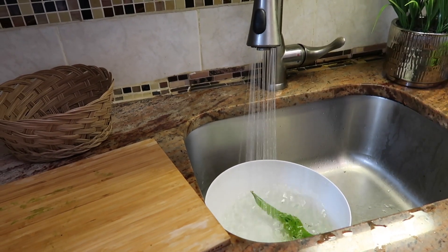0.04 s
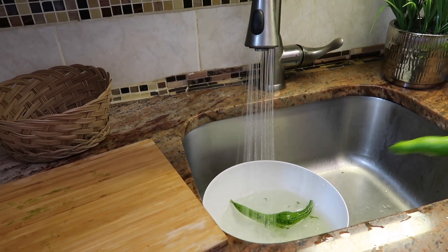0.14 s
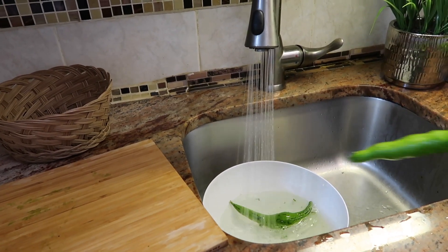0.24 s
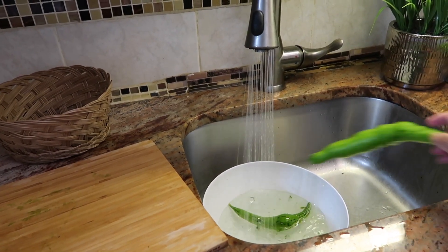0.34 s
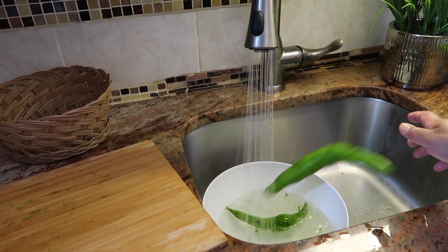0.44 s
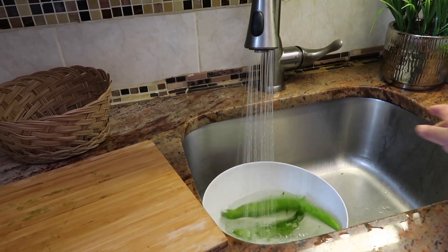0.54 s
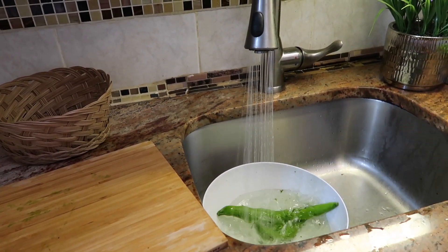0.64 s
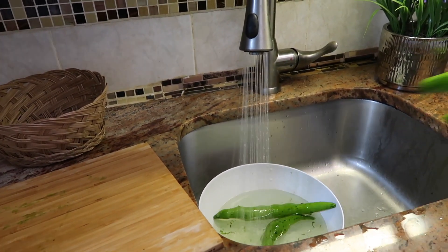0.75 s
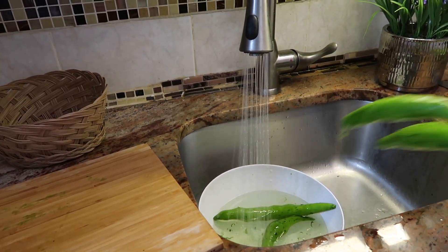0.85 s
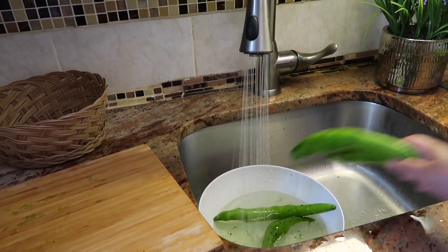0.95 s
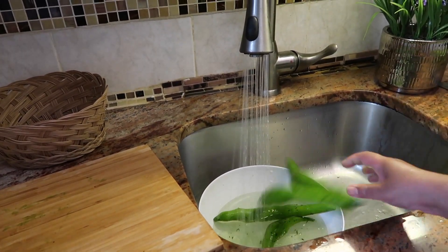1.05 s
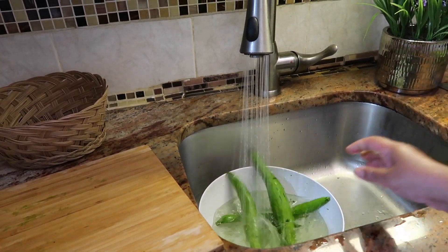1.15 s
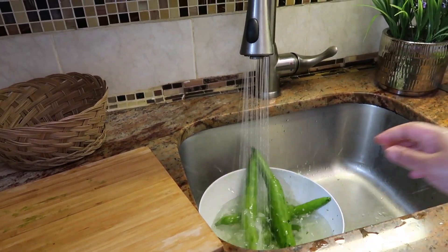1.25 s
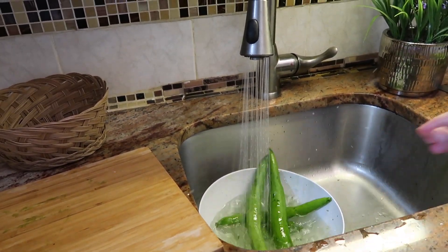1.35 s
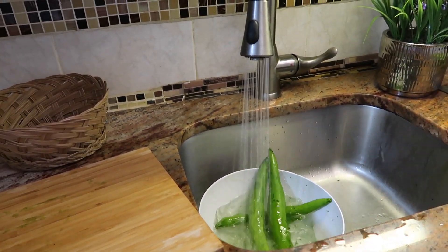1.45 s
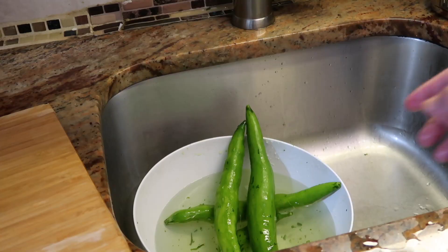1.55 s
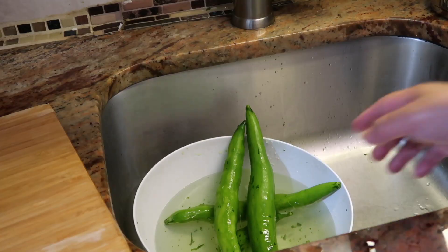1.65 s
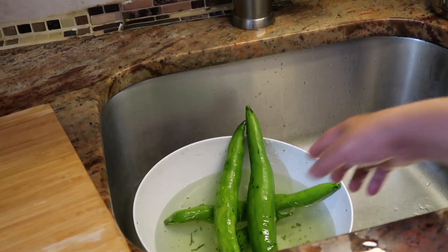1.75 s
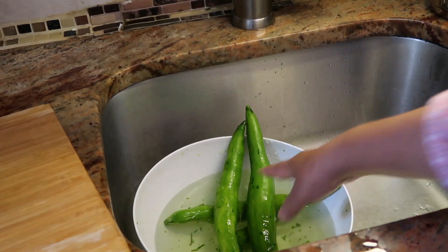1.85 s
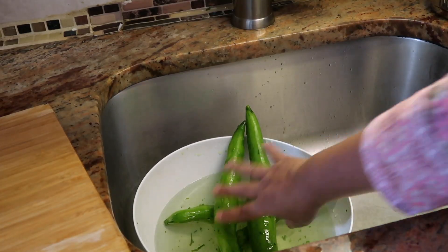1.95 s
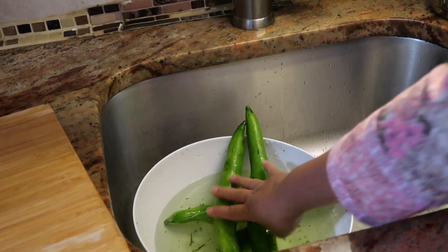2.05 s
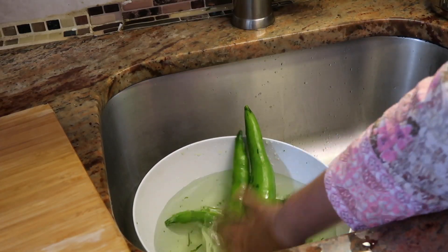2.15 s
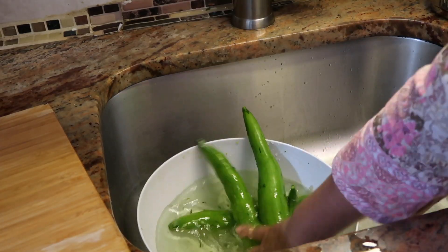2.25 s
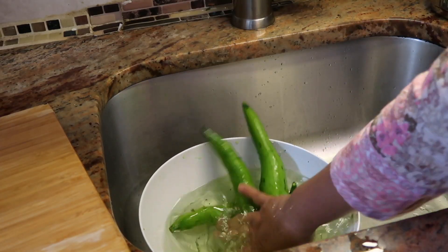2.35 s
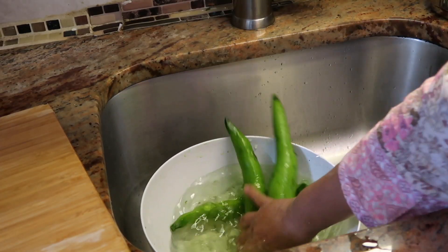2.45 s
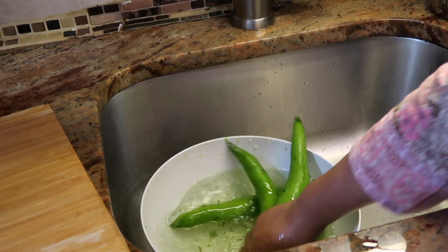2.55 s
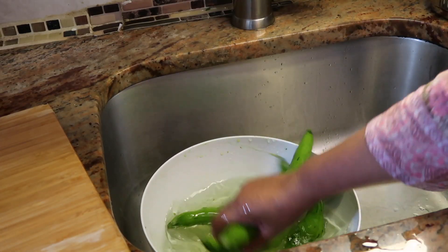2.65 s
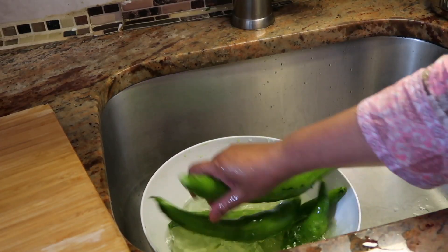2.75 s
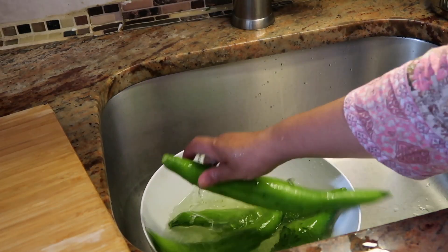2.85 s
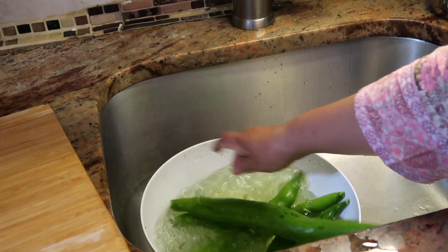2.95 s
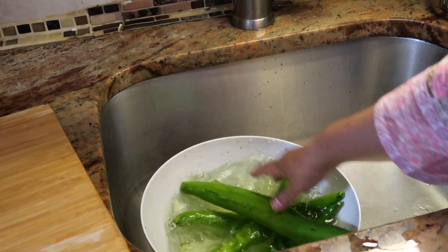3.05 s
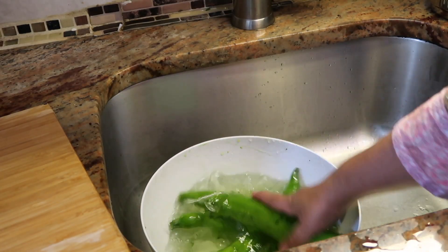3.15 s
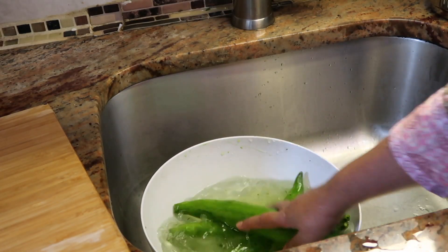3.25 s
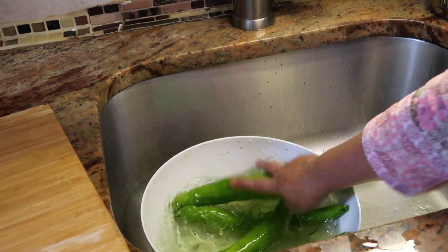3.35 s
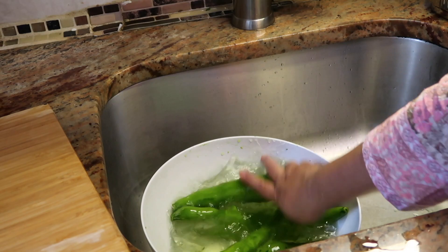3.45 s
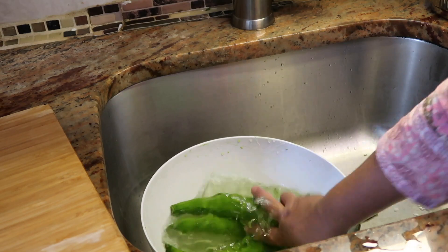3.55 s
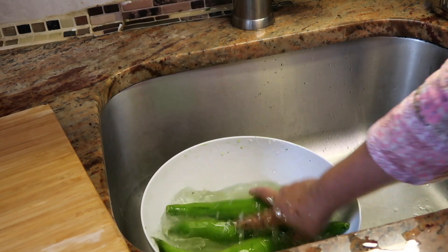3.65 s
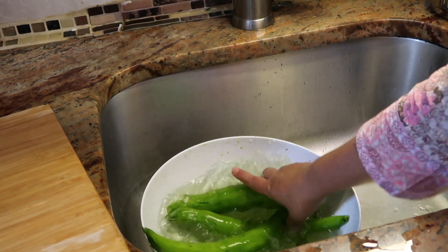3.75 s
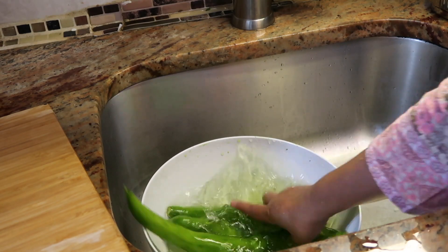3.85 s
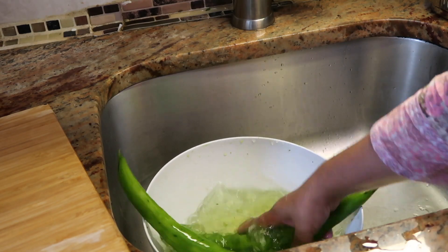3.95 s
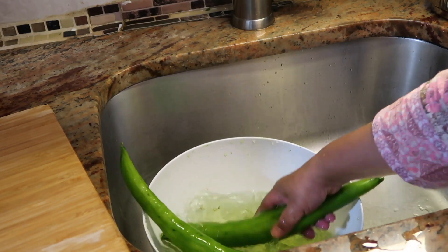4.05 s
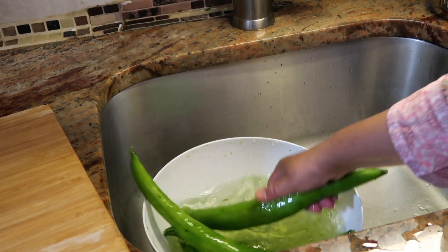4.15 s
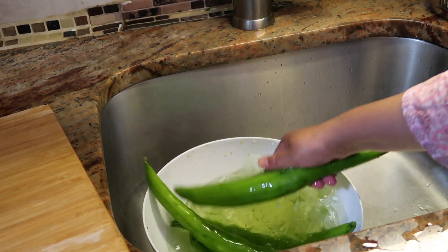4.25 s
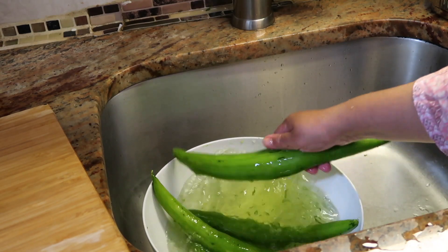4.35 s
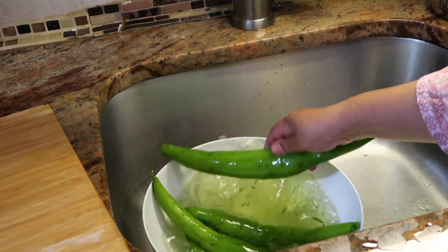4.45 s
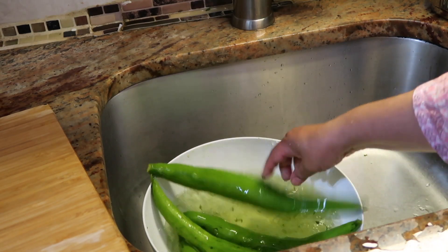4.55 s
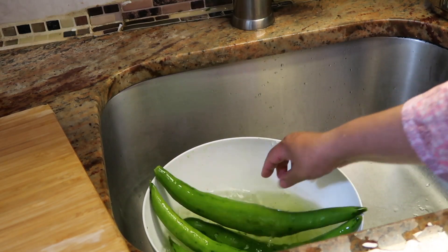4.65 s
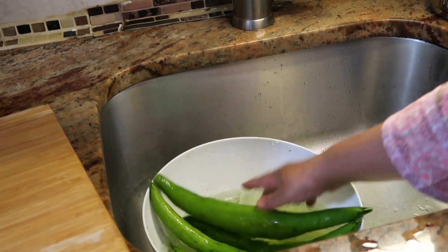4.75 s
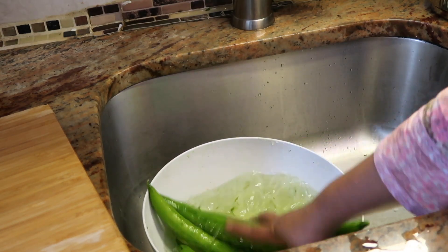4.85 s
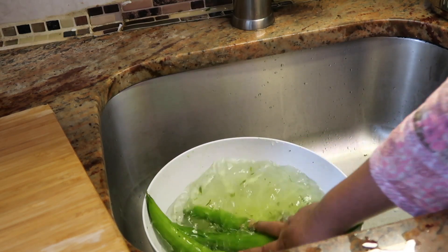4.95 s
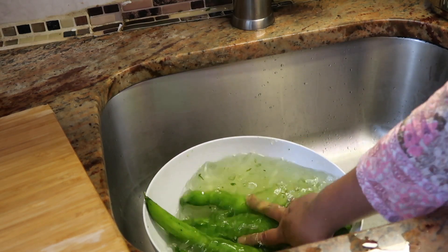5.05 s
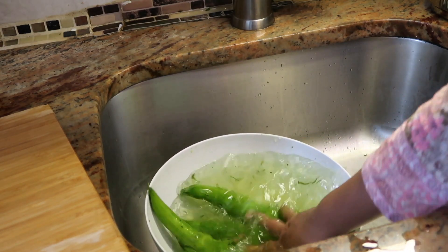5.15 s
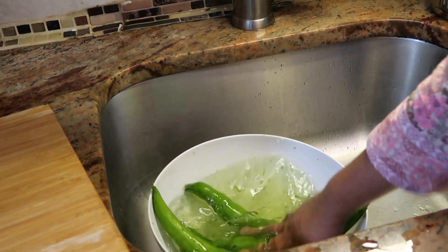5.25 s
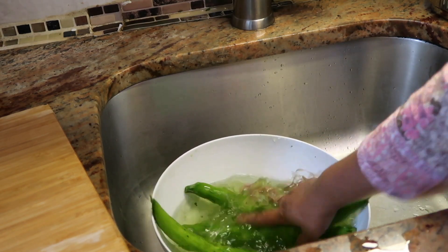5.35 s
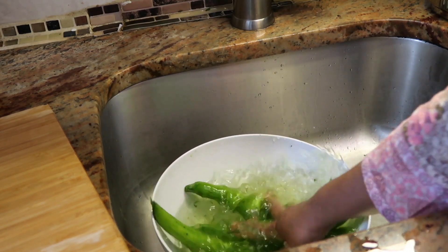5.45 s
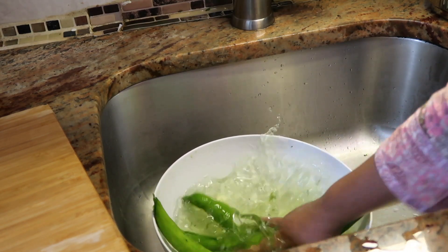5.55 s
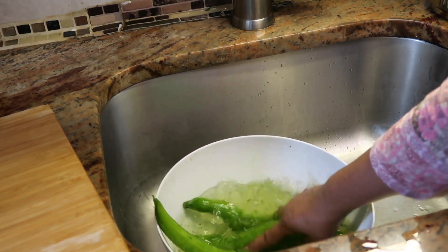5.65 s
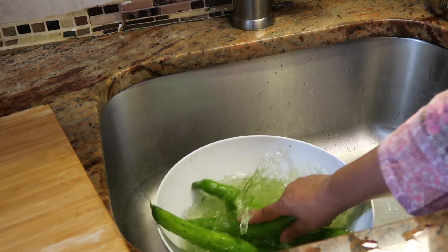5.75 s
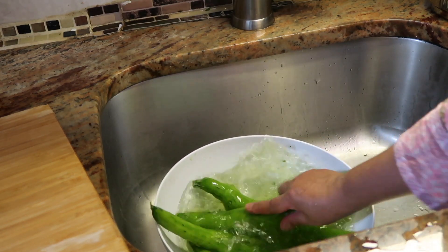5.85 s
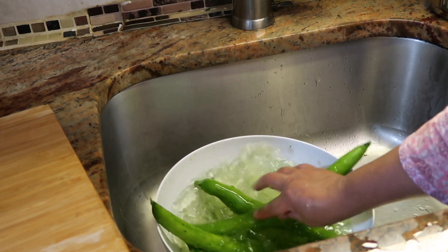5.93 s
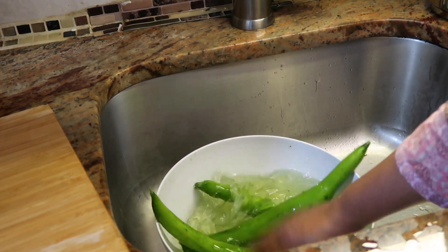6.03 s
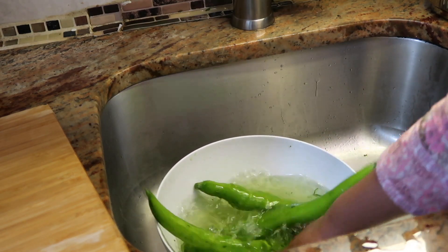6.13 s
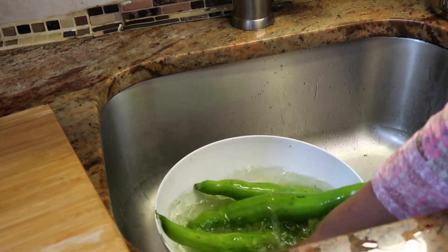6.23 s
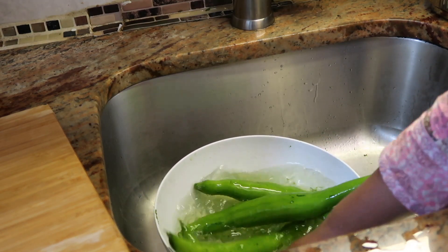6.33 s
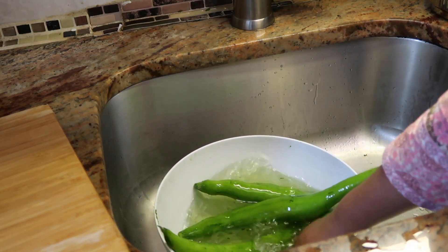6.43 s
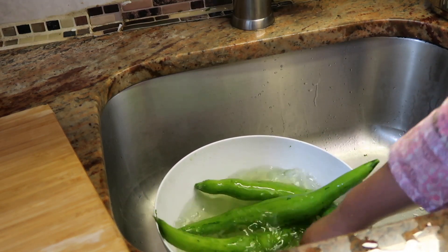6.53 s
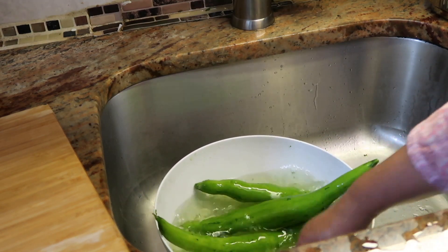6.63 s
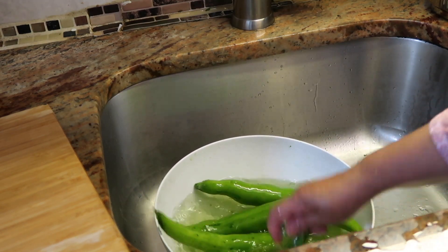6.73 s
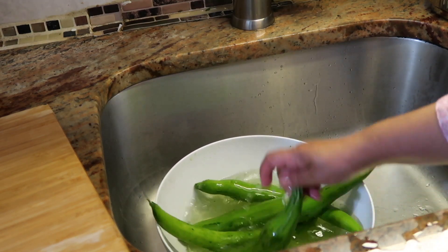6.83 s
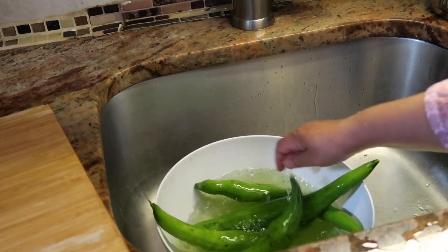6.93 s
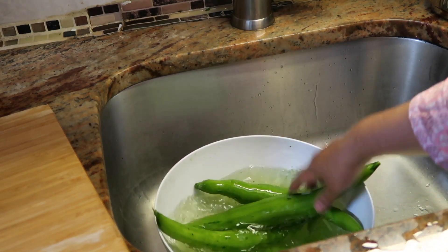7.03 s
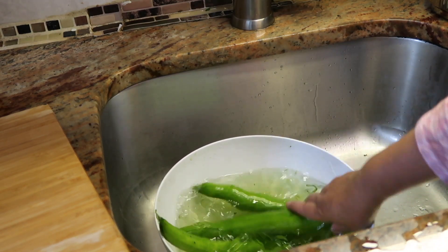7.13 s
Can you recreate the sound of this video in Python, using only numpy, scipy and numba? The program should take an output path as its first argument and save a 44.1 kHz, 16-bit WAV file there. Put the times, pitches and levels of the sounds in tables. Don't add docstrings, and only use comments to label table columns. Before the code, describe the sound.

Hissing tap spray and two bumpy drops in a steel sink cut to quiet, then close, irregular sloshing, bubbly plops and droplet ticks.

```python
import sys
import numpy as np
from scipy import signal
from scipy.fft import rfft, irfft
from scipy.io import wavfile
from scipy.ndimage import uniform_filter1d
from numba import njit

SR = 44100
rng = np.random.default_rng(int(sys.argv[2]) if len(sys.argv) > 2 else 0)


def file_out(sig):
    cols = np.atleast_2d(sig).T
    lim = np.clip(cols, -1, 1)
    pcm = np.round(lim * 32767).astype(np.int16)
    wavfile.write(sys.argv[1], SR, pcm)


def nominal_scale(level):
    x = np.asarray(level, float) / 20
    return 10 ** x


N = 317079
TIME = np.arange(N) / SR


def level(x, db):
    return x * nominal_scale(db) / np.sqrt(np.mean(x ** 2))


def curves(table):
    s, *columns = np.transpose(table)
    return [np.interp(TIME, s, column, left=-150, right=-150) for column in columns]


def colour(x, spectrum):
    hz, db = np.transpose(spectrum)
    bins = np.fft.rfftfreq(x.shape[-1], 1 / SR) + 1
    gain = nominal_scale(np.interp(np.log(bins), np.log(hz + 1), db))
    return irfft(rfft(x) * gain, x.shape[-1])


@njit
def chirps(start, hz, cycles, octaves, size):
    out = np.zeros(N)
    for e in range(len(start)):
        life = cycles[e] * SR / hz[e]
        phase = 0.
        for i in range(min(int(3 * life), N - start[e])):
            pitch_hz = min(hz[e] * 2 ** (octaves[e] * i / life), .45 * SR)
            phase += 2 * np.pi * pitch_hz / SR
            swell = (1 - np.exp(-7 * i / life)) ** 2
            out[start[e] + i] += size[e] * np.sin(phase) * swell * np.exp(-2.5 * i / life)
    return out


def bubbles(s, db, hz, cycles, rise):
    return chirps((s * SR).astype(np.int64), hz, np.clip(cycles, 1, 40), rise, nominal_scale(db))


def swarm(count, low_hz, high_hz, cycles, scatter_db):
    when, size, loudness, life = rng.random((count, 4)).T
    hz = low_hz * (high_hz / low_hz) ** size
    db = -scatter_db * np.log(1 - loudness)
    return level(bubbles(when * N / SR, db, hz, cycles * (0.35 + 1.28 * life), 0.26 * life), 0)


def ring(push, modes):
    out = 0
    for k, (hz, db, t60) in enumerate(modes):
        pole = np.exp(2j * np.pi * hz / SR - np.log(1000) / (t60 * SR))
        out = out + (-1) ** k * nominal_scale(db) * signal.lfilter([1], [1, -pole], push).imag
    return out


def sink(force):
    floor_modes = [(87, -19.5, 0.87), (129, -10, .25), (147.1, 6, 0.27), (158.3, -6, 0.75)]
    second_modes = [(189, 0.5, 0.3), (211, 4.5, 0.31), (222, -3, 0.095)]
    rim_modes = [(273, -14, .25), (299.4, -8, 0.41), (401.5, -8.5, 0.23), (483, 0, 0.088),
                 (527, -12.5, 0.099), (618, -27.5, 0.14), (704, -6.5, 0.13), (960, -21, 0.32),
                 (1230, 0.5, 0.099)]
    return ring(force[0], floor_modes) + ring(force[1], second_modes) + ring(force[2], rim_modes)


def basin(wet_db):
    # pitch_hz [Hz], t60_s [s]
    echo_times = [(300, 0.089), (1000, 0.14), (2500, 0.19), (6000, 0.17), (14000, 0.047)]
    t = np.arange(SR // 2) / SR
    hz, t60 = np.transpose(echo_times)
    tail = np.zeros((2, len(t)))
    for centre in 100 * 2 ** np.arange(0, 7.4, .5):
        edges = [centre / 2 ** .25, centre * 2 ** .25]
        sos = signal.butter(2, edges, "band", fs=SR, output="sos")
        decay = np.interp(np.log(centre), np.log(hz), t60)
        tail += signal.sosfilt(sos, rng.standard_normal(tail.shape)) * nominal_scale(-60 * t / decay)
    tail *= nominal_scale(wet_db) / np.sqrt(np.sum(tail ** 2, axis=1, keepdims=True))
    tail[0, 0] += 1
    return tail


def echoed(source, wet_db):
    return signal.oaconvolve(source[None], basin(wet_db), axes=1)[:, :N]


def kitchen():
    # pitch_hz [Hz], level_db [dB per Hz]
    room_colour = [(18, -83.5), (30, -32.5), (281, -4.5), (311, -9), (393, -6.5), (592, -15.5),
                   (656, -14.5), (917, -16), (1220, -22), (2090, -24), (14000, -69.5)]
    return level(colour(rng.standard_normal((2, N)), room_colour), -60)


def tap():
    # start_s [s], level_db [dB], treble_db [dB above level]
    flow = [(0.0, -44.5, -8.5), (0.106, -48, -0.5), (0.174, -26.5, -3), (0.578, -27, -5.5),
            (0.642, -25, -2.5), (0.75, -27.5, -2.5), (0.758, -27, -4), (0.8, -29, -3.5), (1.18, -28, -3),
            (1.196, -24, -1), (1.252, -31.5, -4.5), (1.512, -29.5, -4), (1.53, -74, -32.5)]
    # pitch_hz [Hz], level_db [dB per Hz]
    spray_colour = [(24, -52), (40, -23), (297, -6), (363, -0.5), (392, -1), (600, -7), (733, -4.5),
                    (1150, -6), (1370, -5.5), (1550, -4.5), (2100, -5), (11600, -13.5), (14100, -28.5),
                    (16000, -72)]
    db, treble_db = curves(flow)
    crackle = swarm(count=30000, low_hz=1500, high_hz=15000, cycles=1.5, scatter_db=0.0)
    foam = swarm(count=9000, low_hz=400, high_hz=4000, cycles=7.7, scatter_db=2.5)
    patter = crackle + foam
    bins = rfft(rng.standard_normal((2, N)) + .5 * np.array([patter, np.roll(patter, SR)]))
    flat = irfft(bins / uniform_filter1d(np.abs(bins), size=3000), N)
    spray = colour(flat, spray_colour)
    low = signal.sosfilt(signal.butter(2, 3500, fs=SR, output="sos"), spray)
    treble = level(spray - low, -1.5) * nominal_scale(treble_db)
    drum = level(sink(rng.standard_normal((3, N)) * nominal_scale([[-6], [-6], [0.5]])), -17)
    return nominal_scale(db) * (level(low, -0.55) + drum + treble)


def knocks():
    # start_s [s], peak_db [dB], second_db and rim_db [dB above peak]
    blows = [(0.578, -37.5, -5, -11), (0.617, -23.5, -9, 1), (0.647, -22.5, 1, -5), (0.68, -28, -6, 3),
             (1.129, -37.5, 6, 12), (1.195, -14, -7.5, -1), (2.23, -31.5, -9, -16.5),
             (2.292, -38, -7.5, -12), (2.589, -46, -3, -6), (2.928, -26, -9.5, -4), (3.054, -28, -6, -2.5),
             (3.167, -45.5, -6, -1), (3.648, -39.5, -9, -11), (3.774, -54, 9.5, -3), (4.056, -38, -10.5, 9),
             (4.668, -55, 3, 16), (4.965, -36, -6.5, -13), (5.129, -59.5, -5, 21.5),
             (5.206, -36.5, -10, -2), (5.58, -40.5, -3.5, -12), (5.988, -40.5, -7.5, -10.5),
             (6.138, -46.5, -5, -7), (6.254, -45.5, 3, 10), (6.372, -35.5, 1, 2), (6.617, -54, -5, -13),
             (7.046, -34, -10, -18)]
    s, db, second_db, rim_db = np.transpose(blows)
    force = np.zeros((3, N))
    force[:, (s * SR).astype(int)] = nominal_scale([db + 0.5, db + second_db, db + rim_db - 1])
    pushes = [np.hanning(int(ms * SR / 1000)) for ms in (3.5, 2.5, 1.1)]
    return sink([signal.lfilter(push / push.sum(), [1], f) for push, f in zip(pushes, force)])


def splashes(place, places):
    # start_s [s], level_db [dB], low_hz [Hz], high_hz [Hz], length_s [s]
    bursts = [(.62, -32.5, 400, 2980, .04), (1.188, -29.5, 500, 6850, .012), (1.943, -63, 1950, 5870, 0.22),
              (2.074, -58, 1800, 4500, 0.024), (2.253, -35.5, 693, 5950, .1),
              (2.329, -34.5, 606, 4500, 0.12), (2.67, -46, 2100, 6300, 0.038),
              (2.835, -35, 1400, 4000, 0.11), (3.028, -41.5, 500, 4000, .04),
              (3.156, -40.5, 2650, 6910, .006), (3.427, -36.5, 940, 5040, .02),
              (3.602, -36.5, 2300, 8300, 0.044), (4.05, -41, 565, 4000, .06),
              (4.653, -39.5, 400, 3550, .012), (4.952, -40.5, 2470, 8150, 0.037),
              (5.179, -43, 2270, 6050, .06), (5.348, -35.5, 1040, 6000, .08),
              (6.157, -29.5, 910, 6300, .07), (6.243, -36.5, 814, 6000, .09),
              (6.668, -31.5, 620, 3040, 0.018), (6.721, -43, 903, 3060, 0.053)]
    s, db, low_hz, high_hz, length = np.array(bursts).T[:, :, None][:, place * 0:]
    draw = rng.random((len(bursts), 24, 4)).transpose(2, 0, 1)
    start = s + length * np.sqrt(draw[0] * draw[1])
    loudness = db - 3 * np.log(1 - draw[3])
    hz = low_hz * (high_hz / low_hz) ** draw[2]
    cycles, rise = 1.6 + 5 * draw[3], 0.24 * draw[1]
    return bubbles(*(column.ravel() for column in (start, loudness, hz, cycles, rise)))


def hand(place, places):
    # start_s [s], peak_db [dB], pitch_hz [Hz], cycles
    pockets = [(2.251, -31.5, 4040, 4.6, 0.24), (2.286, -32, 670, 10, 0.35), (2.336, -20, 690, 6.6, 0.51),
               (2.544, -44, 1140, 5.9, 0.27), (2.581, -28, 2770, 7.6, 0.11), (2.658, -34, 3070, 4.6, 0.27),
               (2.781, -57, 1770, 9, 0.17), (2.796, -22, 1500, 7.5, 0.2), (2.847, -24, 1660, 6.6, 0.38),
               (2.921, -36, 533, 9, 0.19), (3.022, -38, 810, 3.4, 0.37), (3.044, -30, 870, 5.7, 0.28),
               (3.162, -29, 3120, 12, 0.51), (3.413, -59, 706, 5.7, 0.34), (3.429, -32, 1200, 5.7, 0.57),
               (3.579, -33, 3220, 9, 0.3), (3.59, -36, 950, 9.4, 0.3), (3.607, -25, 3920, 3.3, 0.21),
               (3.696, -34, 1130, 6.2, 0.3), (3.708, -20, 3440, 9, 0.12), (3.795, -27, 1600, 9, 0.25),
               (3.824, -18, 890, 3.7, 0.21), (3.912, -37, 3070, 7, 0.26), (3.938, -29, 2360, 7.6, 0.21),
               (3.968, -37, 2410, 7.9, 0.3), (3.981, -25, 2580, 7.1, 0.18), (4.036, -26, 1500, 5.6, 0.26),
               (4.052, -23, 501, 4.1, 0.17), (4.077, -18, 2270, 5.4, 0.24), (4.113, -23, 2750, 10, 0.43),
               (4.141, -26.5, 1560, 11, 0.26), (4.654, -22, 1320, 3.4, 0.22), (4.913, -40, 2740, 14, 0.3),
               (4.959, -37.5, 2760, 10.6, 0.28), (4.971, -37, 3230, 12, 0.33), (5.015, -41, 2500, 7.7, 0.3),
               (5.028, -29, 2730, 9, 0.3), (5.072, -30, 1870, 4.2, 0.18), (5.145, -40, 3430, 9.8, 0.36),
               (5.185, -33, 2870, 4.5, 0.6), (5.254, -32, 3760, 6.2, 0.26), (5.309, -19.5, 1065, 6.7, 0.32),
               (5.366, -18, 1290, 6.2, 0.15), (5.437, -32, 1300, 9.8, 0.22), (5.515, -47, 1980, 12, 0.21),
               (5.527, -26, 2120, 6.1, 0.35), (5.591, -31, 3420, 10, 0.3), (5.62, -32, 2270, 6.5, 0.19),
               (5.684, -18.5, 2370, 7.1, 0.27), (5.778, -18, 944, 8.2, 0.51), (5.84, -31, 1015, 9.9, 0.3),
               (5.887, -24, 3400, 9, 0.23), (5.917, -32, 3500, 9, 0.46), (5.961, -30, 1890, 7.8, 0.33),
               (6.119, -36, 2330, 16, 0.19), (6.161, -18, 2670, 4.6, 0.44), (6.183, -20, 1160, 4, 0.48),
               (6.36, -45, 540, 12, 0.15), (6.435, -27, 2150, 5.9, 0.38), (6.573, -35, 2850, 6.1, 0.25),
               (6.587, -34, 2780, 15, 0.13), (6.672, -32, 2166, 3, 0.24),
               (2.888, -32, 3230, 6, 0.34), (2.958, -30, 2700, 8, 0.16), (3.715, -27, 1880, 9, .1),
                    (4.299, -52.5, 3030, 9.9, .1), (4.632, -61, 7100, 14, 0.093),
                    (5.765, -36, 3770, 11, .1), (5.798, -31, 970, 4.5, .2), (6.739, -27, 3270, 9.1, 0.31),
                    (7.074, -46, 3600, 4, .3)]
    # start_s [s], peak_db [dB], pitch_hz [Hz], cycles [count]
    droplets = [(2.2525, -22.5, 4220, 1.53), (2.4426, -35, 4450, 5.6), (2.6516, -57, 6300, 7.1),
                (2.697, -41.5, 7400, 12), (2.8255, -43, 4200, 3.6), (2.844, -35, 4600, 6.3),
                (2.8886, -31, 5200, 4), (3.0323, -29, 8100, 2.8), (3.161, -44, 4730, 3.7),
                (3.4249, -44, 4800, 4), (3.4301, -29.5, 4140, 1.33), (3.4634, -28.5, 7100, 1.3),
                (3.578, -48, 5200, 4.6), (3.59, -37, 4550, 3.6), (3.6065, -23, 7260, 2.4),
                (3.755, -39.5, 4970, 4), (3.826, -37, 4200, 4.4), (3.9422, -28, 5040, 1.4),
                (4.027, -32, 10600, 4), (4.0534, -34.5, 4840, 3.3), (4.2445, -52, 4460, 5),
                (4.2954, -38, 6460, 4.8), (4.3855, -47.5, 9200, 4.8), (4.4136, -40, 4400, 2.1),
                (4.7339, -37, 11900, 12), (4.921, -42, 6100, 2.6), (4.9334, -35, 4600, 1.5),
                (4.9556, -31.5, 5770, 2.6), (5.0653, -38, 4630, 2.1), (5.2522, -52, 4360, 3.5),
                (5.3525, -31, 5630, 3.2), (5.5096, -45, 4520, 3), (5.5327, -31, 6600, 3.7),
                (5.603, -30, 6900, 2.1), (5.6753, -35, 5000, 3.2), (5.6934, -26, 4650, 1.8),
                (5.851, -42, 9500, 4), (5.885, -26, 4860, 1.6), (6.0334, -29, 7230, 1.5),
                (6.145, -37, 5040, 2.6), (6.157, -24, 5500, 1.3), (6.1786, -19, 4200, 1.33),
                (6.2615, -33, 4180, 6.4), (6.2805, -22, 5620, 2.6), (6.5757, -37, 4270, 2.5),
                (6.5843, -35, 4860, 1.7), (6.613, -39, 4600, 4.7), (6.677, -44, 5200, 4),
                (6.861, -40.5, 5630, 4.6), (7.0752, -47, 8950, 3.2)]
    # start_s [s], gurgle_db [dB], splash_db [dB], fizz_db [dB]
    stirring = [(1.9, -74, -83, -91), (2.0, -57, -62.5, -68.5), (2.12, -74, -81, -99),
                (2.28, -39, -33, -44), (2.4, -45, -24.5, -47), (2.46, -49, -37, -49.5),
                (2.56, -49.5, -55, -61), (2.65, -57.5, -87, -57), (2.84, -65, -40.5, -63),
                (2.96, -52, -45.5, -66), (3.05, -43, -60.5, -52), (3.11, -62, -79, -68.5),
                (3.19, -65, -89, -52), (3.25, -57, -97, -83), (3.48, -62, -56, -91), (3.53, -66, -79, -88),
                (3.61, -51, -31.5, -42), (3.65, -44, -51.5, -50.5), (3.73, -42.5, -39, -59),
                (3.83, -47, -43.5, -53), (3.95, -58, -52, -68), (4.05, -48, -36.5, -47),
                (4.2, -45.5, -71.5, -77.5), (4.3, -78.5, -81, -83), (4.45, -62, -101, -107),
                (4.71, -66, -65, -77), (4.86, -63.5, -91, -93), (4.98, -61.5, -56, -47),
                (5.1, -56, -42.5, -75), (5.15, -47.5, -54, -50), (5.27, -57, -47.5, -55),
                (5.44, -55, -52, -59.5), (5.54, -63, -40, -51), (5.73, -48, -42, -49),
                (5.82, -46, -38, -66.5), (5.97, -62, -55.5, -60), (6.2, -60, -64, -56),
                (6.28, -41, -39.5, -43), (6.34, -41, -49, -58), (6.41, -52.5, -41, -74),
                (6.63, -52.5, -69.5, -75), (6.7, -48, -47, -65.5), (6.78, -67, -48.5, -87.5),
                (6.83, -64.5, -76, -73.5), (6.89, -71, -94, -87.5), (7.06, -65, -60.5, -92),
                (7.19, -54, -72, -69.5)]
    s, db, hz, cycles, rise = np.transpose(sorted(pockets)[place::places])
    pops = bubbles(s, db + 7.5, hz, cycles, rise)
    s, db, hz, cycles = np.transpose(droplets[place::places])
    ticks = bubbles(s, db + 14, hz, cycles, np.full_like(hz, 0.079))
    gurgle_db, splash_db, fizz_db = curves(stirring)
    gurgle = nominal_scale(gurgle_db - 14.5) * swarm(count=500, low_hz=500, high_hz=1625, cycles=7, scatter_db=2.5)
    splash = nominal_scale(splash_db - 15) * swarm(count=1200, low_hz=1565, high_hz=4500, cycles=6.3, scatter_db=4.0)
    fizz = nominal_scale(fizz_db - 8.5) * swarm(count=3000, low_hz=4500, high_hz=14000, cycles=7.3, scatter_db=3.5)
    return pops + ticks + gurgle + splash + fizz + splashes(place, places)


def scene():
    # pitch_hz [Hz], side_db [dB above mid]
    ports = [(60, -22.5), (110, -47.5), (200, -20), (380, -17.5), (700, -19), (1290, -20), (2380, -14.5),
             (4400, -6), (8120, -1), (15000, 4)]
    # start_s [s], fade_in_s [s], end_s [s], fade_out_s [s]
    shots = [
        (-.1, .01, .756, .012),
        (0.754, .05, 1.524, .014),
        (1.522, 0.058, 7.4, .01),
    ]
    water = kitchen() + tap() + echoed(knocks(), wet_db=-2.0)
    for place in range(5):
        water += echoed(hand(place, places=5), wet_db=3.5)
    edit = np.zeros(N)
    for start, fade_in, end, fade_out in shots:
        edit += np.clip((TIME - start) / fade_in, 0, 1) * np.clip((end - TIME) / fade_out, 0, 1)
    mid, side = water[0] * edit, colour(water[1] * edit, ports)
    return np.array([mid + side, mid - side])


def top_cut(x):
    return signal.sosfilt(signal.butter(12, 16470, fs=SR, output="sos"), x)


def record(dry):
    bass_cut = signal.butter(3, 70.6, "high", fs=SR, output="sos")
    return top_cut(signal.sosfilt(bass_cut, dry))


dry = scene()
out = record(dry)
file_out(out)
```